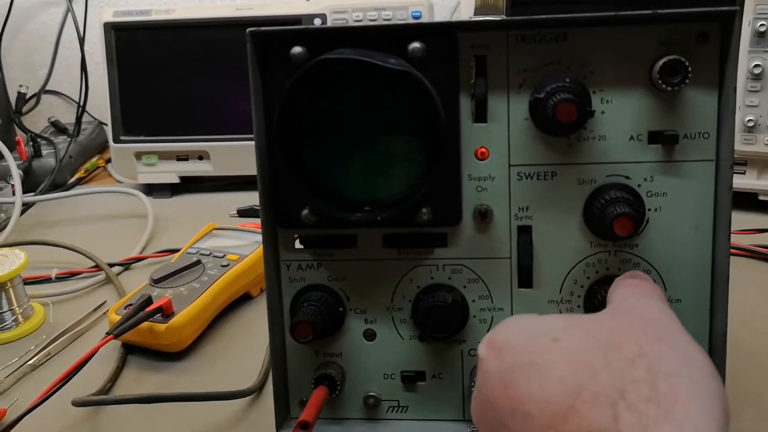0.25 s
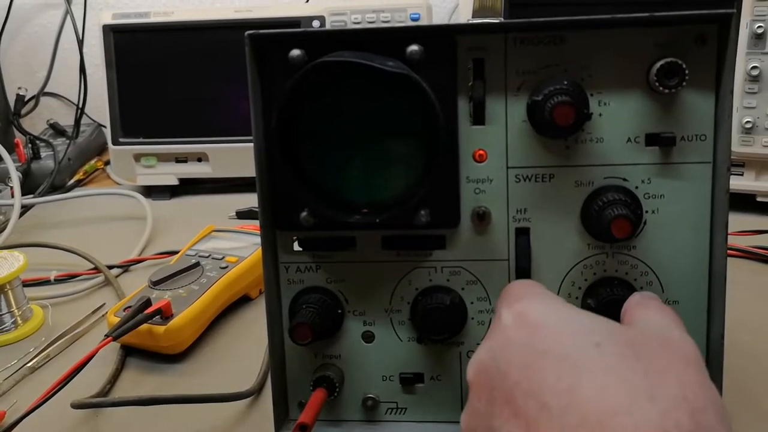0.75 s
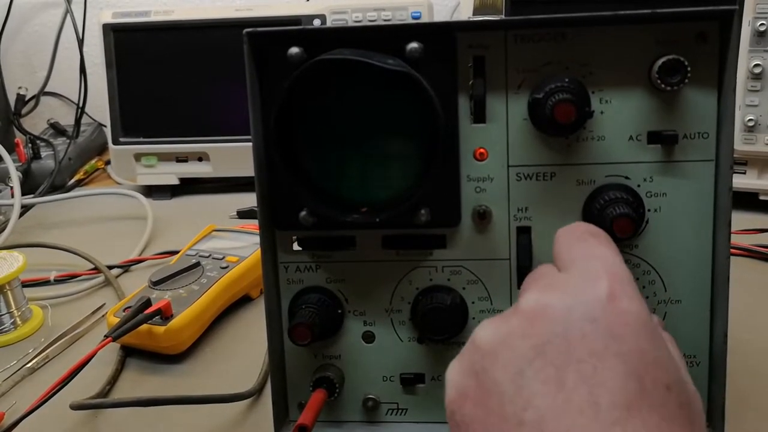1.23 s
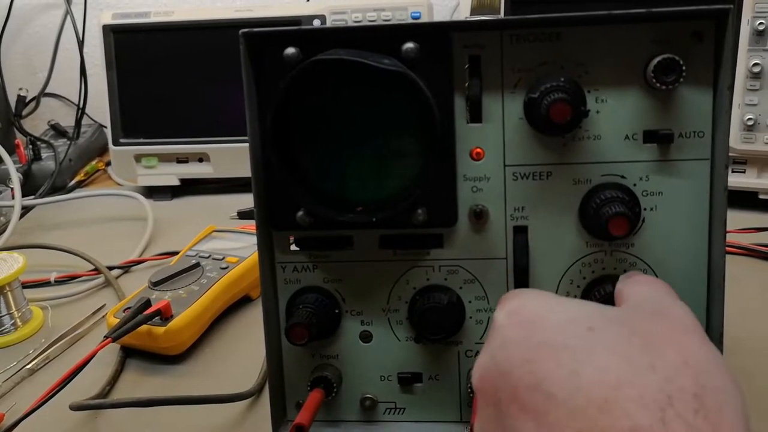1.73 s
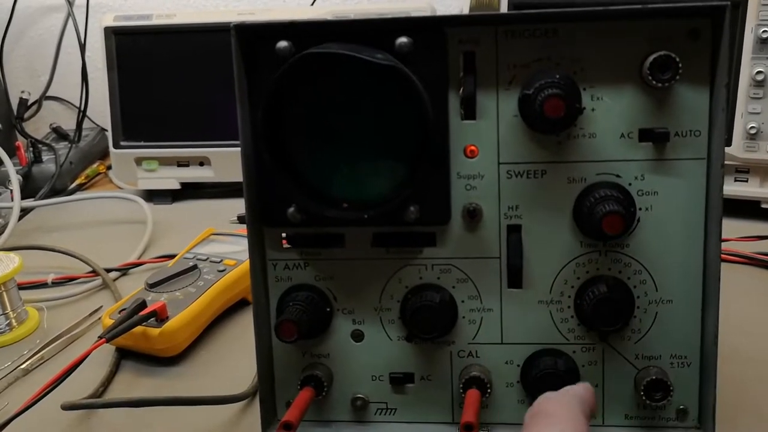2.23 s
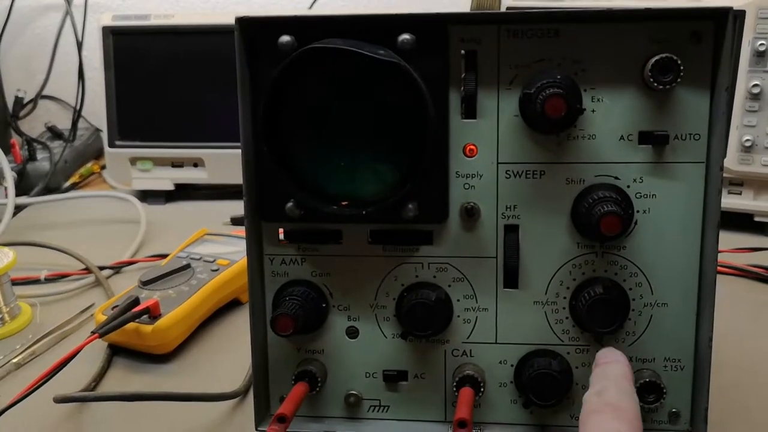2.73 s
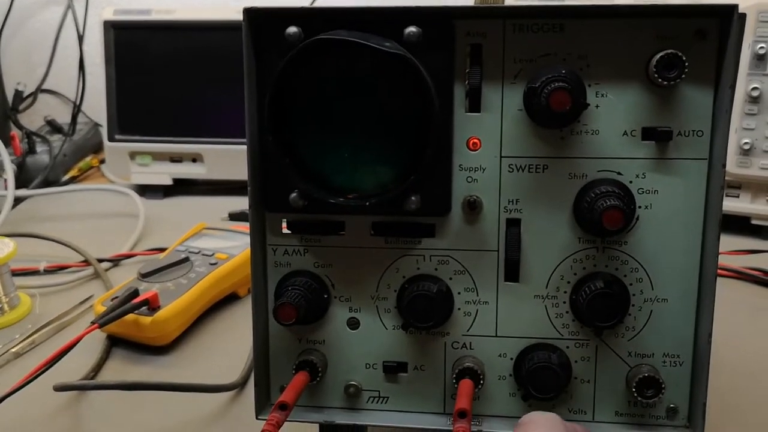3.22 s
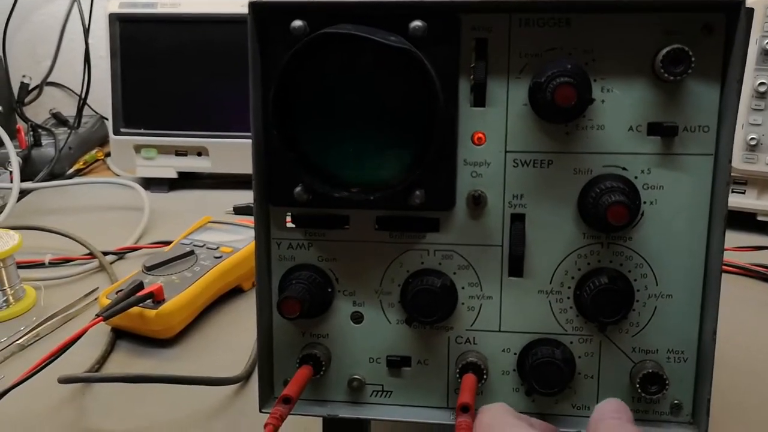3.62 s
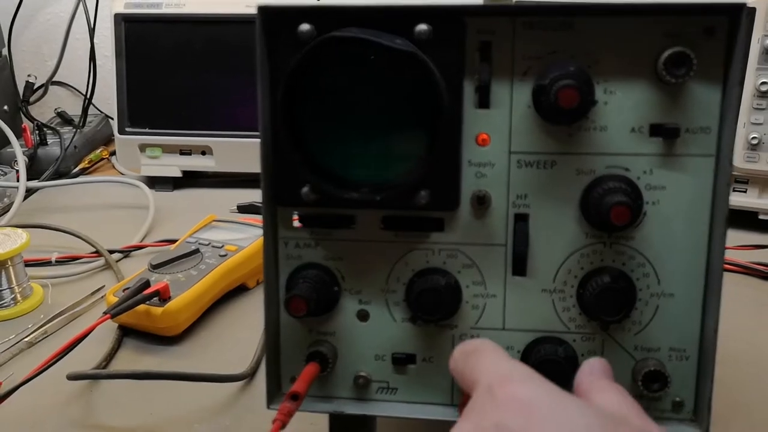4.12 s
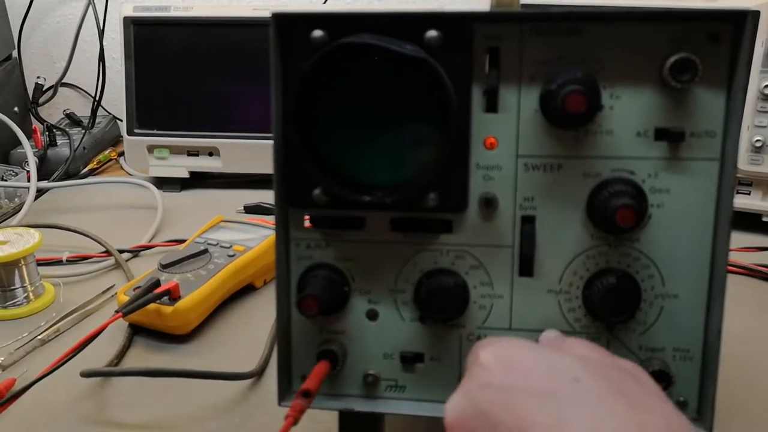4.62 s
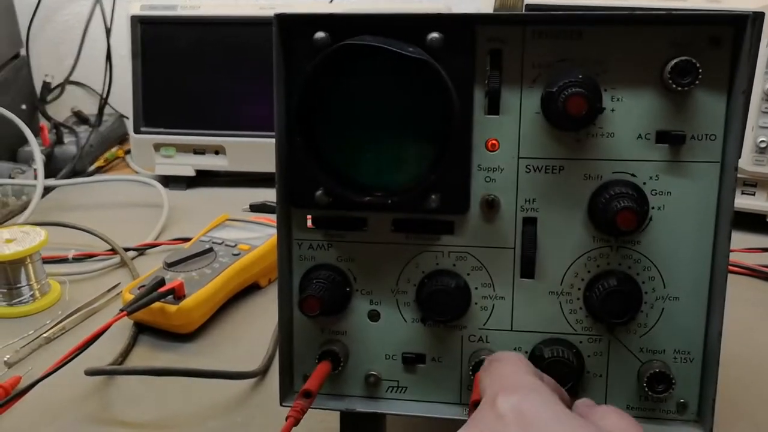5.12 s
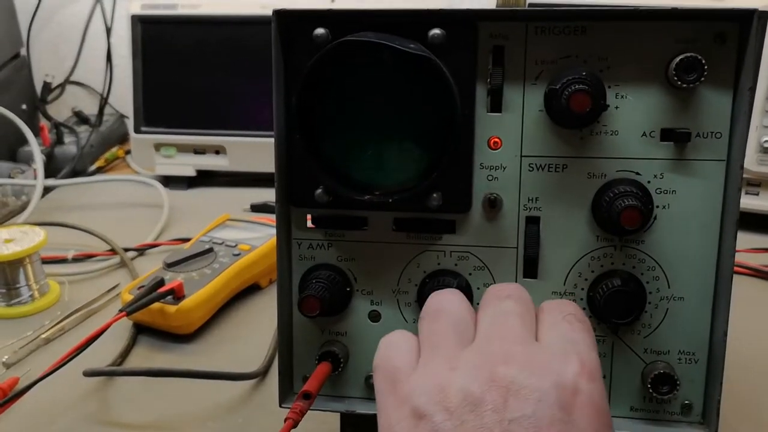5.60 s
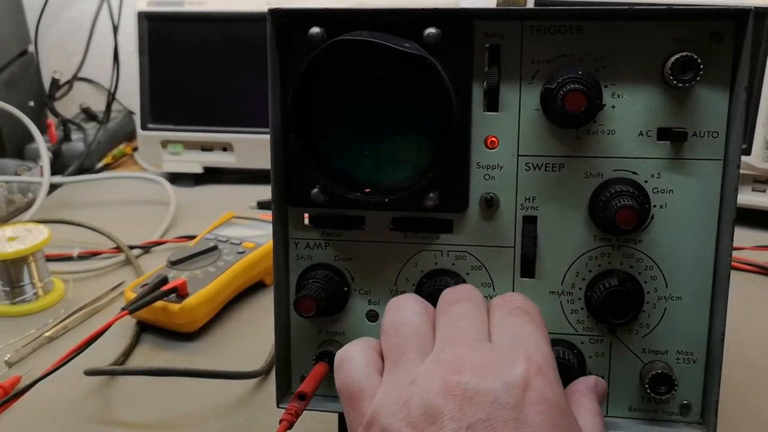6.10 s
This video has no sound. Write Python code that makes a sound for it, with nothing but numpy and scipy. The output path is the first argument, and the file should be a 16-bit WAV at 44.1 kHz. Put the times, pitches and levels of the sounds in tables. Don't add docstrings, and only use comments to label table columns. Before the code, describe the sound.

Crisp, bright mechanical snaps of detented knobs, recorded near in stereo by a hand-held camera indoors. Nine steps of one switch come first, slow then hurried, with a short spring twang; after over two seconds of faint taps, skin rubs and grip rumble, three steps of another switch clack and buzz. Short room reflections follow, above low fan noise, mains hum and a faint electronic whine.

```python
import sys
import numpy as np
from scipy import signal
from scipy.fft import rfft
from scipy.io import wavfile
from scipy.ndimage import uniform_filter1d

SR = 44100
rng = np.random.default_rng(int(sys.argv[2]) if len(sys.argv) > 2 else 0)


def ratio(d):
    e = np.asarray(d, float) / 20
    return 10 ** e


def unload_wav(signal):
    wavfile.write(
        sys.argv[1],
        SR,
        np.round(np.clip(np.atleast_2d(signal).T, -1, 1) * 32767).astype(np.int16),
    )


N = 280035
UPPER_UNTIL_S = 3

# (time [s], snap level [dB], left-right [dB], shaft ring level [dB], shaft ring pitch [Hz])
STEPS = [(0.2383, -14.5, -4.5, -11, 3215), (0.5587, -13, -5, -6, 2950), (0.8568, -12.5, -7, -14, 3044),
         (0.9223, -12, -4, -8.5, 2592), (1.525, -7, -7.5, -11.5, 3800), (1.6045, -10, -7.5, -11, 3773),
         (1.6952, -11.5, -5.5, -17, 3780), (1.8096, -10.5, -4.5, -11, 3240),
         (1.8776, -11, -7.5, -4.5, 3550), (4.5504, -9, -6.5, -19, 3817), (4.7319, -8, -7, -1, 2915),
         (4.9733, -9.5, -8, -7.5, 3617)]


def evened(x):
    return x / np.sqrt(np.mean(x ** 2) + 1e-20)


def read(points, hz):
    f, value = np.transpose(points)
    return np.interp(np.log(hz + 1), np.log(f + 1), value)


def add(mix, s, sound):
    part = mix[..., round(s * SR):][..., :sound.shape[-1]]
    part += sound[..., :part.shape[-1]]


def sides(pan_db):
    return ratio(np.array([[.5], [-.5]]) * pan_db)


def bump(t, s, rise_s, fall_s):
    return np.exp(-((t - s) / np.where(t < s, rise_s, fall_s)) ** 2)


def resonate(x, hz, width_hz):
    turn = np.exp(2j * np.pi * np.cumsum(hz * np.ones(x.shape[-1])) / SR)
    r = np.exp(-np.pi * width_hz / SR)
    return 2 * (turn * signal.lfilter([1 - r], [1, -r], x / turn)).real


def steep(x, hz, width_hz):
    return evened(resonate(resonate(x, hz, width_hz), hz, width_hz))


def body(x, peaks):
    return sum(ratio(db) * resonate(resonate(x, hz, width_hz), hz, width_hz) for hz, width_hz, db in peaks)


def ring(modes, rise_s, size):
    t = np.arange(size) / SR
    tone = sum(ratio(db - 60 * t / t60_s) * np.sin(2 * np.pi * hz * t) for hz, db, t60_s in modes)
    return tone * (1 - np.exp(-t / rise_s)) ** 2


def causal(db):
    log_gain = np.log(ratio(np.maximum(np.r_[db, db[-2:0:-1]], -100)))
    return np.fft.ifft(np.exp(np.conj(signal.hilbert(log_gain)))).real[:512]


def levelled(x):
    power = uniform_filter1d(abs(rfft(x, 2048)) ** 2, size=16)
    return np.convolve(x, causal(-10 * np.log10(power / power.mean())))[:len(x)]


def hush():
    busy = np.zeros(N)
    for s, db, *_ in STEPS:
        add(busy, s, np.full(round(.22 * SR), ratio(db - 7.0)))
    return ratio(-6.0 * uniform_filter1d(np.minimum(busy, 1), 900))


def background():
    # (frequency [Hz], density [dB per Hz])
    wash_colour = [(35, -39), (60, -5.5), (108, 3.5), (124, -20), (217, -13), (301, -13), (553, -28),
                   (2140, -19), (4030, -29.5), (5460, -30.5), (6000, -34.5), (9570, -36.5), (10300, -38.5),
                   (11300, -41), (16000, -37.5)]
    # (frequency [Hz], correlation [-1..1])
    port_likeness = [(60, 0.8), (150, 0.93), (380, -0.68), (950, -0.27), (2380, -0.26), (5980, 0.52),
                     (15000, 0.84)]
    # (frequency [Hz], level [dB], width [Hz])
    hum_lines = [(301, -82, 2.8), (257, -87.5, 3.6), (176, -84.5, 3.9)]
    # (time [s], drone level [dB])
    fan_load = [(0, -4), (.5, 2), (1.3, -1), (2.1, 4), (2.9, -3.5), (3.4, 2), (4.3, -4.5), (5.6, 1.5),
                (6.35, -3)]
    # (peak time [s], level [dB], rise [s], fall [s])
    swishes = [(.15, -3, 0.089, 0.11), (.5, 0.5, .05, .1), (0.759, 4, .05, .04), (2.3, 5.5, 0.25, .2),
               (3.39, 9.5, .015, .05), (3.669, 2.5, 0.056, 0.087), (3.92, 7, 0.065, 0.15),
               (4.359, 15, 0.13, 0.078), (5.3, 8.5, 0.12, 0.28), (5.9, 3, 0.069, .08), (6.146, 9, .02, .06)]
    frames, hz = N // 256 + 5, np.fft.rfftfreq(1024, 1 / SR)
    t, hz_column = np.arange(frames) * 256 / SR, hz[:, None]
    a, b, c, d, patches = rng.standard_normal((frames, 513, 5)).T
    patches = evened(uniform_filter1d(uniform_filter1d(patches, 12, 0), 14, 1))
    low = 1 / (1 + (hz_column / 700) ** 4)
    motion = sum(ratio(2 * db) * bump(t, s, rise_s, fall_s) for s, db, rise_s, fall_s in swishes)
    swell_db = low * np.interp(t, *np.transpose(fan_load)) + (1 - low) * (4.5 * np.log10(1 + motion) - 1.5)
    swell_db += 10 * np.log10(4.4 + motion) * np.exp(-((hz_column - 7700) / 900) ** 2)
    same, left = np.clip(read(port_likeness, hz), -1, 1)[:, None], a + 1j * b
    z = np.array([left, same * left + np.sqrt(1 - same ** 2) * (c + 1j * d)])
    z *= ratio(read(wash_colour, hz)[:, None] + 1.2 * patches + swell_db) * (hz_column > 120)
    wash = ratio(-70.0) * evened(signal.istft(z, nperseg=1024, noverlap=768)[1][:, :N])
    hum = sum(ratio(db) * evened(resonate(rng.standard_normal(N), f, width_hz)) for f, db, width_hz in hum_lines)
    return hush() * wash + hum


def whine():
    # (time [s], level [dB], left-right [dB])
    standing_waves = [(0.0, -78, 16), (0.188, -72.5, 1.5), (1.199, -77, 10.5), (1.48, -81, 0),
                      (2.147, -74, 7), (2.44, -83, 25), (2.65, -74.5, 10), (3.05, -75.5, 12.5),
                      (3.41, -71.5, 2), (3.9, -72, 2), (4.3, -74.5, 3.5), (4.499, -72, 2.5),
                      (5.219, -71.5, 5), (5.6, -79, -6.5), (5.884, -72, 2), (6.033, -75, 9),
                      (6.17, -74.5, 11), (6.35, -82, 24)]
    # (time [s], frequency [Hz])
    pitch = [(0, 5310), (3.3, 5318), (4.4, 5312), (5.2, 5311), (6.35, 5314)]
    t = np.arange(N) / SR
    s, *columns = np.transpose(standing_waves)
    db, pan_db = (np.interp(t, s, column) for column in columns)
    hz = np.interp(t, *np.transpose(pitch))
    wander_hz = 2.0 * evened(uniform_filter1d(rng.standard_normal(N), 1500))
    turn = 2 * np.pi * np.cumsum(hz + wander_hz) / SR
    quiet = hush()
    tone = ratio(db - 4.0) * np.sin(turn + np.array([[0], [.8]])) * sides(pan_db) * quiet ** 4
    octave_db = -82.5 + 0.17 * pan_db
    octave = ratio(octave_db + 4.0) * np.sin(2 * turn) * np.array([[.18], [1]])
    return np.sqrt(2) * quiet * (tone + octave)


def handling():
    # (peak time [s], level [dB], width [s])
    jolts = [(1.02, -48, 0.032), (1.41, -57, 0.097), (1.91, -47.5, 0.12), (2.3, -50.5, 0.092),
             (2.64, -53, 0.11), (3.11, -53.5, 0.093), (3.31, -49.5, .04), (3.969, -56, 0.07),
             (4.48, -51.5, 0.099), (5.4, -54.5, 0.43), (5.7, -55, 0.14), (6.1, -57.5, 0.27)]
    t, near = np.arange(N) / SR, np.arange(16000) / SR
    kick, shake, slow = np.zeros(N), np.zeros(N), t[::64]
    for s, db, *_ in STEPS:
        add(kick, s, ratio(db - 36.5) * bump(near, 0.11, 0.039, 0.048) * np.sin(2 * np.pi * 33 * near))
        add(shake, s, ratio(2 * (db - 39.5)) * bump(near, .055, .02, 0.042))
    grip = ratio(2 * -63) + sum(ratio(2 * db) * bump(slow, s, width_s, width_s) for s, db, width_s in jolts)
    lowpass = signal.butter(2, 22, fs=SR, output="sos")
    rumble = evened(signal.sosfilt(lowpass, rng.standard_normal(N)))
    rumble = np.sqrt(np.interp(t, slow, grip)) * rumble + kick
    line = evened(resonate(rng.standard_normal(N), 102, 7.0))
    drone = steep(rng.standard_normal(N), 98, 50)
    mains = ratio(-68) * (1.1 * line + 0.17 * drone) + np.sqrt(shake) * (.2 * line + 0.42 * drone)
    return mains * sides(1.0) + rumble + 0.044 * np.array([[1], [-1]]) * np.roll(rumble, SR)


def rubs():
    # (start [s], length [s], level [dB], hollow [Hz], share of the length until loudest [0..1])
    strokes = [(3.671, .131, -75.1, 1271, .51), (3.831, .291, -68.6, 1181, .39),
               (3.837, .28, -70.6, 2660, .66), (3.932, .09, -68.5, 3701, .6), (4.163, .211, -63, 2281, .47),
               (4.286, .141, -76, 1611, .83), (4.241, .181, -68.1, 5101, .78),
               (5.715, .181, -73.1, 1621, .41), (5.721, .182, -68.6, 2691, .61),
               (5.952, .141, -72.1, 1731, .12), (5.949, .151, -71.1, 2521, .2),
               (6.122, .201, -73.6, 2571, .38), (6.119, .088, -68.2, 5102, .26),
               (6.121, .066, -77.1, 1445, .22)]
    # (frequency [Hz], width [Hz], level [dB])
    hiss = [(5270, 1600, 0), (7640, 2800, -12)]
    # (frequency [Hz], left-right [dB])
    rub_lean = [(1200, -0.5), (1650, -7), (2650, -1), (3700, -6), (5100, -5.5)]
    out = np.zeros((2, N))
    for s, length_s, db, hz, peak in strokes:
        u = np.linspace(0, 1, round(length_s * SR))
        peak = np.clip(peak, .05, .95)
        from_peak = np.where(u < peak, 1 - u / peak, (u - peak) / (1 - peak))
        stroke = ratio(db - 14.5 * from_peak ** 2.1)
        grain_db = 2.8 * evened(uniform_filter1d(rng.standard_normal(14000), 120))
        grit = (rng.standard_normal((2, 14000)) * ratio(grain_db))[:, :len(u)]
        hollow_hz = hz * (1 + 0.059 * (.5 - u))
        if hz > 4800:
            sound = evened(body(grit, hiss))
        else:
            sound = 0.63 * steep(grit, hollow_hz, 230) + 700 / hz * steep(grit, hollow_hz, 0.48 * hz)
        add(out, s, stroke * sound * signal.windows.tukey(len(u), .25) * sides(read(rub_lean, hz)))
    return out


def touches():
    # (time [s], peak level [dB], pitch [Hz], left-right [dB], bright edge [dB])
    taps = [(0.765, -60.5, 1324, 3.5, -4), (2.168, -50, 907, -9, -19), (2.176, -58, 2580, -7, -11),
            (2.194, -61, 1058, -7, -12), (3.378, -62, 3500, -11.5, 16), (3.655, -68.5, 3300, -3, -1),
            (3.905, -67, 6970, 0, -2.5), (3.979, -62, 1105, 5, -8), (4.044, -56, 2780, -4, -7),
            (4.882, -48.5, 977, -8, -8), (4.942, -54, 1060, 4, -14.5), (5.442, -67.5, 854, -1, -22.5),
            (5.682, -54, 2200, 0, 6), (5.858, -54, 2500, -5.5, -20), (6.118, -52, 3100, -17, -18),
            (6.188, -66.5, 870, -7, -16)]
    out, t = np.zeros((2, N)), np.arange(1500) / SR
    for s, db, hz, pan_db, edge_db in taps:
        puff = rng.standard_normal((2, 1500)) * np.exp(-t * hz / 9.6)
        tap = steep(puff.sum(0), hz, 0.38 * hz) + ratio(edge_db) * steep(puff, 4500, 5000)
        tap += 0.3 * steep(puff * np.exp(-t / .0012), 1.36 * hz, 2.9 * hz)
        add(out, s, ratio(db) * sides(pan_db) * tap / abs(tap).max())
    return out


def case():
    # (time [s], case thump [dB], panel knock [dB])
    blows = [(0.237, -49, -41.5), (0.559, -45.5, -47), (0.853, -42.5, -44), (0.921, -38, -40),
             (1.524, -55.5, -30), (1.603, -43.5, -44.5), (1.694, -46, -41.5), (1.811, -42.5, -36.5),
             (1.879, -42, -37), (4.548, -36, -30.5), (4.73, -36, -33.5), (4.972, -39.5, -53.5)]
    # (frequency [Hz], level [dB], t60 [s])
    thump_modes = [(103.3, 4, 0.18), (94.56, -5.5, 0.57), (116, -11.5, 0.042)]
    # (frequency [Hz], width [Hz], level [dB])
    upper_knock = [(653, 14, -3), (1296, 240, -1.5), (1700, 440, 1.5)]
    # (frequency [Hz], width [Hz], level [dB])
    lower_knock = [(286.7, 36, -24.5), (916, 53, -2.5), (1053.5, 130, -3.5), (1231, 230, 1.5),
                   (1762, 51, 4)]
    out, t = np.zeros((2, N)), np.arange(5000) / SR
    for s, thump_db, knock_db in blows:
        upper = s < UPPER_UNTIL_S
        blow = rng.standard_normal((3, 5000)) * (np.exp(-t / 0.0089) + 0.083 * np.exp(-t / 0.074))
        knock = body(blow[:2] * 0.72 + blow[2], upper_knock if upper else lower_knock)
        add(out, s, ratio(knock_db - 14.5) * evened(knock))
        slower = blow[2] / (np.exp(-t / 0.0022) + 0.25 * np.exp(-t / 0.041))
        boom = steep(slower, 220, 140) * np.sin(np.pi * t / t[-1]) * np.exp(-t / 0.074)
        add(out, s, ratio(thump_db - (12.5 if upper else 17.5)) * boom)
        add(out, s + .008, ratio(thump_db) * ring(thump_modes, 0.0077, size=16000))
    return out


def spring():
    # (time [s], level [dB], time until damped [s])
    twangs = [
        (.244, -48.5, 0.41),
        (.558, -45, 0.13),
        (0.855, -42.5, 0.085),
        (.922, -48, 0.5),
        (1.526, -37, 0.058),
        (1.603, -35.5, 0.049),
        (1.695, -32, 0.021),
        (1.81, -33.5, 0.03),
        (1.877, -36.5, 0.064),
    ]
    # (frequency [Hz], level [dB], t60 [s])
    spring_modes = [(881, -1, 0.54), (870, -13, 0.44), (1750, -15, 1), (652, -12, 0.19)]
    out, t = np.zeros((2, N)), np.arange(22000) / SR
    for s, db, held_s in twangs:
        damping = ratio(-14 * (t / held_s) ** 3)
        add(out, s, ratio(db) * ring(spring_modes, 0.006, size=22000) * damping * sides(1.5))
    return out


def shivers():
    # (time [s], level [dB], pitch [Hz])
    buzzes = [
        (4.733, -25.5, 2920),
    ]
    # (factor on the pitch [ratio], width [Hz], level [dB])
    shaft_modes = [(.94, 85, -1.5), (0.991, 79.6, 1.5), (1.03, 90, -1)]
    out, t = np.zeros((2, N)), np.arange(12000) / SR
    for s, db, hz in buzzes:
        modes = [(k * hz * (1 - 0.1 * t), width_hz, mode_db) for k, width_hz, mode_db in shaft_modes]
        buzz = evened(body(rng.standard_normal((2, 12000)), modes))
        decay = 0.99 * ratio(-60 * t / 0.05) + 0.3 * ratio(-60 * t / 0.34)
        add(out, s + .001, ratio(db) * buzz * decay * sides(-1.5))
    return out


def room(snap, tilt_db, air_db):
    # (frequency [Hz], t60 [s])
    reverberation = [(300, 0.26), (1000, 0.26), (3000, 0.34), (8000, 0.24), (11000, .27), (14000, 0.3)]
    # (frequency [Hz], gain [dB])
    cabinet = [(1000, 3), (2000, 1), (3200, -0.5), (4200, -3.5), (5100, 0), (5800, 2.5), (7800, 4),
               (10000, -1)]
    # (frequency [Hz], left-right [dB])
    tail_lean = [(700, 10), (1900, -3), (3900, -3.5), (5500, -2), (7700, 2.5), (11500, -7.5), (14000, -1.5)]
    hz, t = np.fft.rfftfreq(256, 1 / SR), np.arange(260) * 64 / SR
    hz_column = hz[:, None]
    colour = np.sqrt((abs(signal.stft(snap, nperseg=256)[2]) ** 2).sum((0, 2)))
    colour = uniform_filter1d(colour, size=4) * ratio(read(cabinet, hz))
    colour *= ratio(tilt_db * np.log2(hz / 4000 + 0.34))
    a, b, c, d = rng.standard_normal((260, 129, 4)).T
    same, left = np.clip(1 / (1 + (hz_column / 900) ** 2) + 0.21, 0, 1), a + 1j * b
    z = np.array([left, same * left + np.sqrt(1 - same ** 2) * (c + 1j * d)])
    z *= colour[:, None] * ratio(-60 * t / read(reverberation, hz)[:, None])
    z *= ratio(-5 * bump(t, 0.018, 0.0057, .013) / (1 + (4800 / (hz_column + 1)) ** 6))
    top_db = air_db / (1 + (12500 / (hz + 1)) ** 16)
    z *= ratio(top_db + np.array([[.5], [-.5]]) * read(tail_lean, hz))[..., None]
    z *= ratio(-120 * np.maximum(t - .14, 0))
    tail = signal.istft(z, nperseg=256, noverlap=192)[1]
    tail /= np.sqrt(np.mean(tail[:, :900] ** 2))
    return tail * (1 - np.exp(-np.arange(tail.shape[1]) / SR / 0.006))


def rattle(rattle_ms, bounce_ms, bounce):
    left_paths = [(2, .5), (15, .5), (34, .6), (69, .4)]
    likeness, t = .65, np.arange(1500) / SR
    ticks = rng.standard_normal((2, 1500)) * ratio(1.2 * rng.exponential(1, 1500))
    ticks *= rng.random((2, 1500)) < .6
    shared = sum(share * np.roll(ticks[1], late) for late, share in left_paths)
    ticks[0] = likeness * shared + np.sqrt(1 - likeness ** 2) * ticks[0]
    rise_s = np.array([[.35], [.3]]) / 1000
    ticks *= (1 - np.exp(-t / rise_s)) * np.exp(-t * 1000 / rattle_ms)
    blow = 1.5 * np.exp(-((t - .0005) / 0.00045) ** 2)
    ticks[1] *= 1 + blow + bounce * np.exp(-((t * 1000 - bounce_ms) / 0.45) ** 2)
    bench_echo = 0.83 * np.exp(-((t - .0035) / 0.00059) ** 2)
    ticks[0] *= 1 + .6 * np.exp(-((t - .001) / 0.0006) ** 2) + bench_echo
    return np.array([levelled(c) for c in ticks])


def coloured(ticks, s):
    # (frequency [Hz], density [dB per Hz])
    upper_colour = [(240, -47.5), (400, -21.5), (1350, -18), (2100, -22), (2950, -4), (4100, -9),
                    (5000, -1.5), (5600, -3), (6300, -0.5), (7200, 3.5), (7900, -4), (9400, -3.5),
                    (11000, -12.5), (12500, -27.5), (15300, -31.5), (16000, -45)]
    # (frequency [Hz], density [dB per Hz])
    hurried_colour = [(240, -47.5), (400, -21), (1250, -13.5), (2200, -18), (3200, -3), (3700, -4),
                      (4300, -6), (5100, -1), (5800, -6), (7500, -0.5), (8900, -4), (11000, -14.5),
                      (12500, -27.5), (15300, -33.5), (16000, -48)]
    # (frequency [Hz], density [dB per Hz])
    lower_colour = [(240, -67.5), (400, -46), (1230, -18.5), (1550, -17.5), (2840, -6), (3250, -6.5),
                    (3800, -2.5), (4380, -8.5), (5700, -4), (7300, -1), (9000, -6), (12300, -24.5),
                    (15000, -25.5), (16000, -40)]
    # (frequency [Hz], left-right [dB])
    snap_lean = [(400, -1), (1300, 8.5), (2000, 11), (3100, -0.5), (5000, 3), (7700, 3), (11500, -6.5),
                 (14500, 2.5)]
    hz = np.fft.rfftfreq(2048, 1 / SR)
    if s < 1.2:
        colour = upper_colour
    else:
        colour = hurried_colour if s < UPPER_UNTIL_S else lower_colour
    tones = [causal(read(colour, hz) + side * read(snap_lean, hz) - 9 * (hz < 560)) for side in (.5, -.5)]
    return np.array([np.convolve(c, tone) for c, tone in zip(ticks, tones)])


def sheet(ticks, upper):
    # (frequency [Hz], level [dB], t60 [s])
    upper_sheet = [(1733, -11, 0.11), (2550, -4.5, .12), (2985, -0.5, .12), (3230, -2, .12),
                   (3785, -4.5, .12), (4150, -9.5, .1), (5012, -5, 0.084), (5340, -6, .1), (5730, -3, .1),
                   (6525, -4.5, .1), (7420, -7, .08), (7950, -3.5, .08), (8600, -4, .08), (9500, -6.5, .08)]
    # (frequency [Hz], level [dB], t60 [s])
    lower_sheet = [(1271, -11, 0.056), (1712, -10.5, 0.26), (2720, -3, 0.21), (3155, -7, .2),
                   (3750, -9, .15), (4830, -4, .2), (5400, -5, 0.18), (5733, -6, .25), (6062, -4, .17),
                   (6400, -4.5, .2), (6874, -8, .25), (7370, -2, .15), (8000, -8.5, 0.17), (8592, -8.5, .2)]
    modes = [(hz, db, min(t60_s, .13)) for hz, db, t60_s in (upper_sheet if upper else lower_sheet)]
    ringing = signal.fftconvolve(ticks, ring(modes, 0.0012, size=9000)[None], axes=1)
    return ringing / np.sqrt(np.mean(ringing[:, :2000] ** 2)) * sides(-1.3)


def scrape(db, upper):
    u = np.linspace(0, 1, 1600)
    grit = rng.standard_normal((2, 1600))
    grit = steep(grit, 7300 + 1100 * u, 1300) + 0.31 * steep(grit, 3300, 3200) * u ** 2
    suddenness = 5.7 + 0.4557 * (db + 10.0) if upper else 16.
    climb = np.exp((u - 1) * suddenness) * np.minimum(2 * u, 1)
    return ratio(-38.5 if upper else -59.5) * grit * climb * sides(-5.0)


def steps():
    # (wafer ring [dB], wafer pitch [Hz], bounce after the drop [ms], bounce strength [ratio])
    seats = [(-8, 6250, 1.5, .5), (-24.5, 6000, 3.1, 0.64), (-17, 7100, 2.4, 1.2), (-14, 7300, 4, 1),
             (-2, 7400, 4.8, 1), (-10, 10000, 1.5, .6), (-11, 7500, 2, 0.31), (-16, 13000, 3.2, 0.44),
             (-8, 5700, 3.8, 0.54), (-16, 6400, 4.5, 0.54), (-14.5, 5700, 5.1, 1.1), (-19.5, 9800, 3, .8)]
    # (delay [ms], left level [dB], right level [dB])
    echoes = [
        (9.34, -18.5, -26),
        (13.72, -24.5, -27),
        (18.8, -22.5, -24),
        (33.1, -24.5, -27.5),
    ]
    out = np.zeros((2, N))
    for step, seat in zip(STEPS, seats):
        s, db, pan_db, shaft_db, shaft_hz = step
        wafer_db, wafer_hz, bounce_ms, bounce = seat
        upper = s < UPPER_UNTIL_S
        rattle_ms, tilt_db = 5.74 + 0.4454 * (db + 8.5), 1.4 * (db + 8.0)
        ticks = rattle(rattle_ms, bounce_ms, bounce)
        snap = coloured(ticks, s)
        tail = room(snap, tilt_db, air_db=12 if upper else 1.5)
        padded = np.pad(ticks, ((0, 0), (0, 511)))
        shaft = ratio(shaft_db - 6.0) * steep(padded, shaft_hz, 430)
        wafer = ratio(wafer_db - 5.5) * steep(padded, wafer_hz, 750)
        snap = evened(evened(snap) + shaft + wafer)
        add(out, s - 1600 / SR, scrape(db, upper))
        add(out, s - .0004, ratio(db - 16.0) * sides(pan_db) * snap)
        for late_ms, *ports_db in echoes:
            add(out, s + late_ms / 1000, ratio(db - 18.5 + np.array(ports_db)[:, None]) * snap[::-1])
        add(out, s, ratio(db - 31.5) * sheet(ticks, upper))
        tail_db = -15.5 if upper else -13
        add(out, s, ratio(db + tail_db - 8.0) * tail * sides(-0.66))
    return out


def scene():
    return background() + whine() + handling() + rubs() + touches() + case() + spring() + shivers() + steps()


def top_cut(x):
    return signal.sosfilt(signal.butter(12, 16520, fs=SR, output="sos"), x)


def record(dry):
    power_db = 10 * np.log10(abs(uniform_filter1d((dry ** 2).mean(0), 300, origin=149)) + 1e-12)
    fall_db = np.arange(N) * 60. / SR
    over_db = np.maximum(np.maximum.accumulate(power_db + fall_db) - fall_db + 18.5, 0)
    ducked = dry / ratio(0.23 * uniform_filter1d(over_db, 200, origin=99))
    lowpass = signal.butter(12, 15300, fs=SR, output="sos")
    return top_cut(signal.sosfilt(lowpass, .66 * np.tanh(ducked / .66)))


dry = scene()
out = record(dry)
unload_wav(out)
```